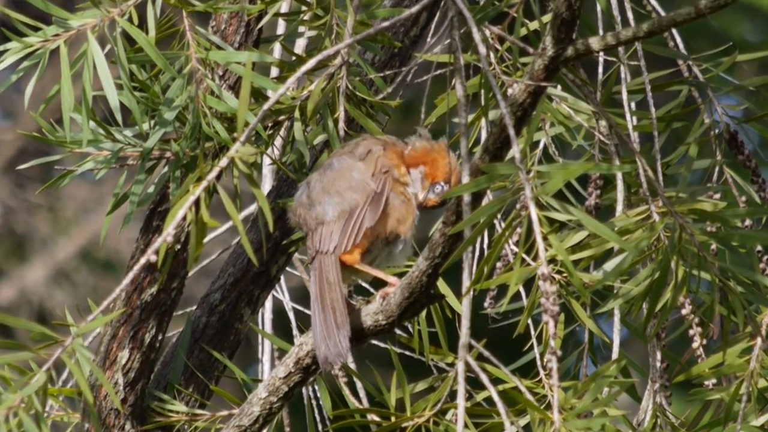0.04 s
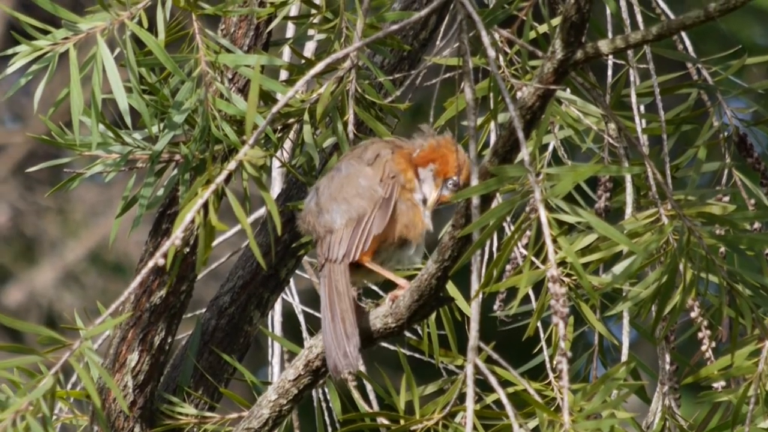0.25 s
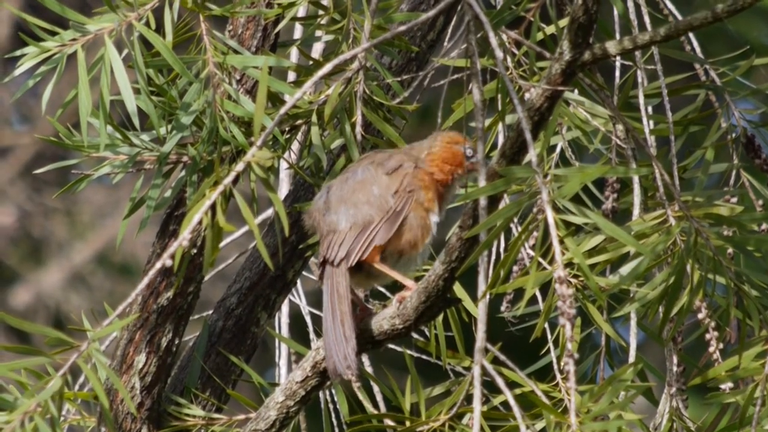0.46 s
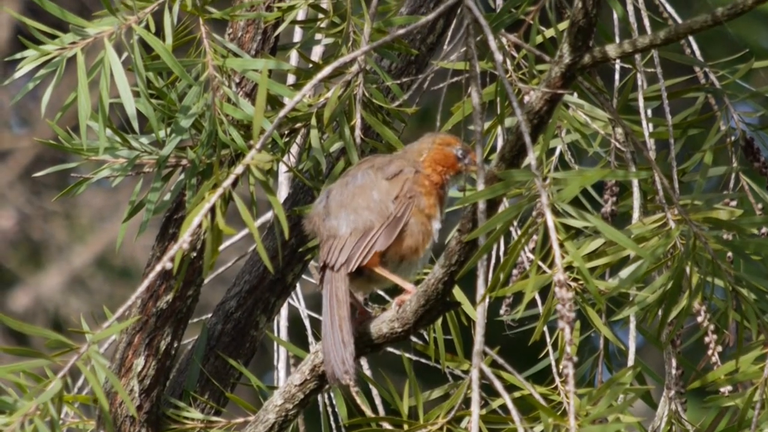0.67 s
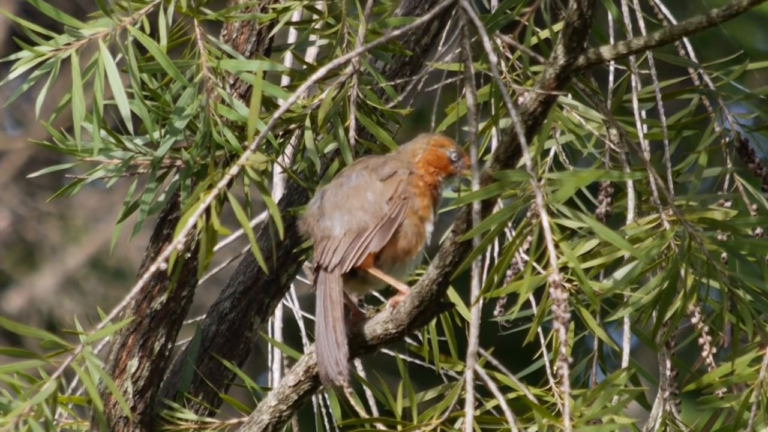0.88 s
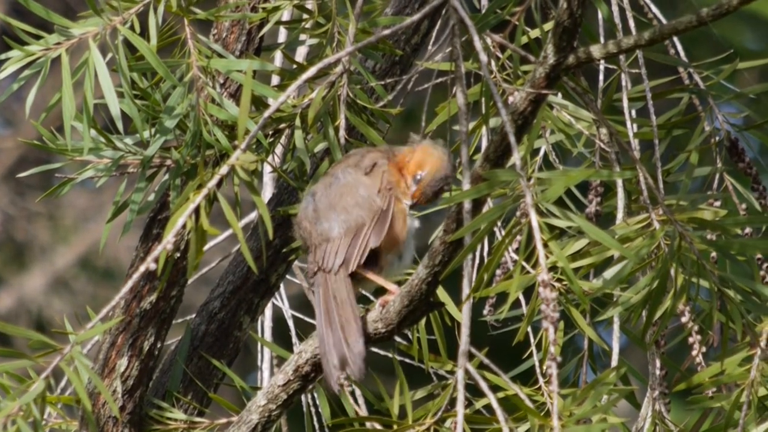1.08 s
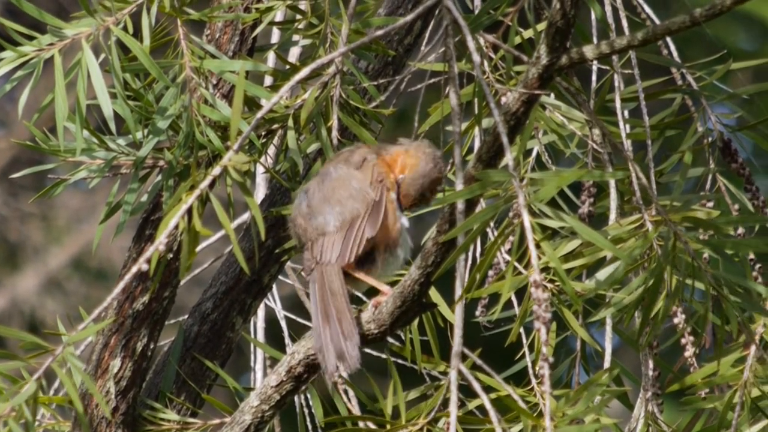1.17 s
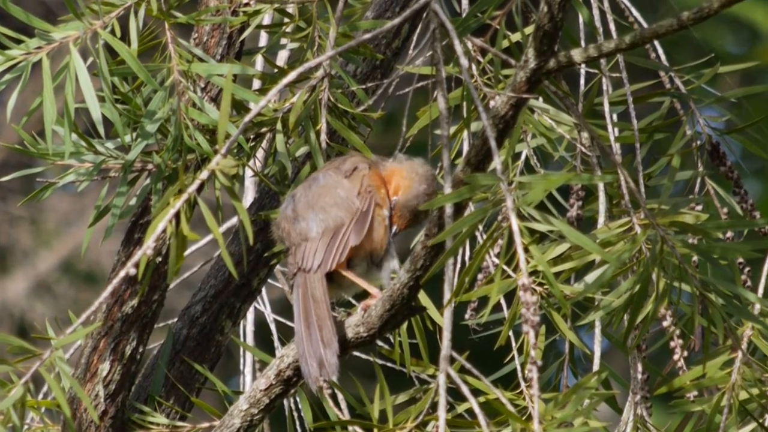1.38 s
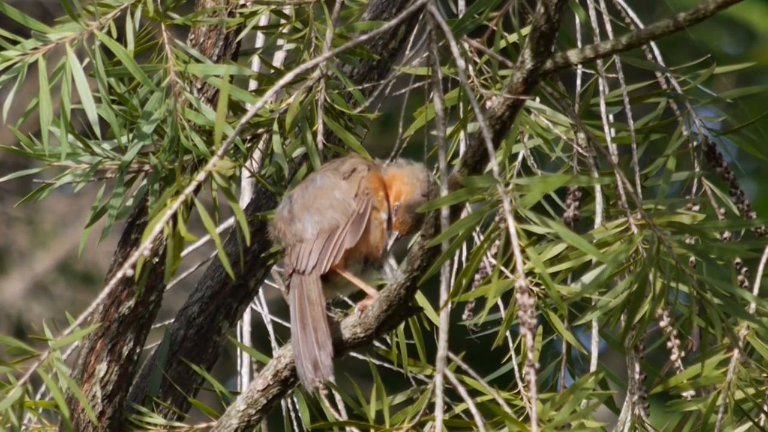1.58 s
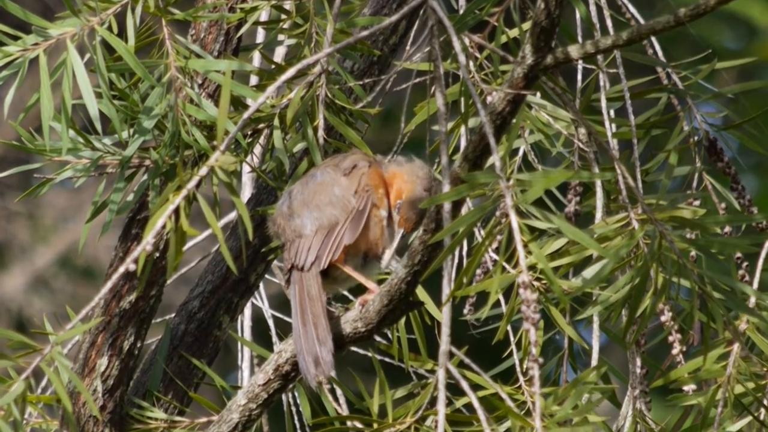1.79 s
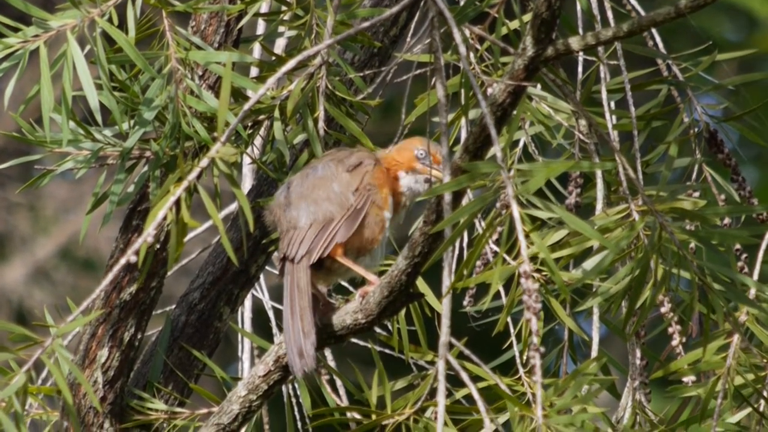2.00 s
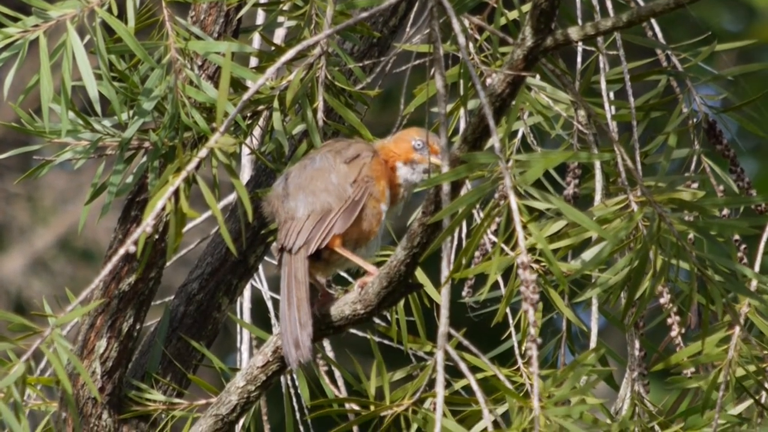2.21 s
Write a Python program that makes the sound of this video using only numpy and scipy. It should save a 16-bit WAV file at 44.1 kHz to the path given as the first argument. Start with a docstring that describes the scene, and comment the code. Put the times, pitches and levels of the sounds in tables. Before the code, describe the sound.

A babbler chatters a few short sharp notes, then a fast sinking trill, among leafy branches

```python
"""Soft outdoor hiss, a low hum and a distant rasp come first, then thin whistles and buzzy slurs of small birds.
A near babbler in leafy branches gives short notes, then swoops up into a fast trill that sinks away; a churr falls.
Calls are harmonics on gliding pitches, coloured by throat or distance; the hiss is shaped noise, the hum two partials.
Branch echoes and a diffuse tail of foliage scatter every call between the left and right channels."""
import sys
import numpy as np
from scipy import signal
from scipy.fft import rfft, irfft
from scipy.io import wavfile
from scipy.ndimage import uniform_filter1d

SR = 44100
rng = np.random.default_rng(int(sys.argv[2]) if len(sys.argv) > 2 else 0)


def master(y):
    """Save y as 16-bit WAV."""
    cut = np.clip(np.atleast_2d(y).T, -1, 1)
    pcm = np.round(cut * 32767)  # scale
    wavfile.write(sys.argv[1], SR, pcm.astype(np.int16))


N = 99225
T = np.arange(N) / SR  # s

# harmonics of the distant rasps and churr before distance dulls them: level_db
RASP_HARMONICS_DB = [-4, -18.5, -24]
# dulling of the rasps and churr by distance: frequency_hz, gain_db
DISTANCE_LOSS = [(6000, -0.5), (9500, -2), (11500, -21), (15000, -20)]
# harmonics of the small birds' whistles and slurs: level_db
WHISTLE_HARMONICS_DB = [0, -38.5]
RASP_EDGE_S, RASP_JITTER = 0.0071, .024  # fade length; rms pitch jitter as a share of the pitch


def amp(db):
    """Decibels to gain."""
    return 10 ** (np.asarray(db) / 20)


def unit(x):
    """Scales to rms 1."""
    return x / np.sqrt(np.mean(x ** 2) + 1e-20)


def read(points, hz):
    """Reads a spectrum on a log-frequency axis."""
    f, value = np.transpose(points)
    return np.interp(np.log(hz + 1), np.log(f), value)


def drift(hz):
    """Smooth random wander of rms 1, up to about this rate."""
    lowpass = 1 + (np.fft.rfftfreq(N, 1 / SR) / hz) ** 4
    return unit(irfft(rfft(rng.standard_normal(N)) / lowpass, N))


def gate(start, end, edge):
    """Opens and closes smoothly, half open at the two times."""
    openness = np.minimum(T - start, end - T) / edge + .5
    return np.sin(np.pi / 2 * np.clip(openness, 0, 1)) ** 2


def contour(points, edge_s=.005):
    """Pitch and gain of one note from its curve, with the pitch corners rounded."""
    s, hz, db = np.transpose(points)
    pitch = uniform_filter1d(np.interp(T, s, hz), size=180)
    return pitch, amp(np.interp(T, s, db)) * gate(s[0], s[-1], edge_s)


def voice(hz, gain, harmonics_db, throat=None):
    """Harmonics on one pitch, each weighted by the throat or distance response as it glides."""
    out, on = np.zeros(N), gain > 0
    turn = 2 * np.pi * np.cumsum(hz[on]) / SR
    for k, db in enumerate(harmonics_db, 1):
        colour = read(throat, k * abs(hz[on])) if throat else 0
        audible = k * hz[on] < SR / 2  # no harmonic folds over
        out[on] += amp(db + colour) * audible * np.sin(k * turn)
    return np.sqrt(2) * gain * out


def air():
    """Outdoor hiss: shaped noise with drifting patches, a varying treble and partly alike channels."""
    # colour of the hiss before patches and treble changes: frequency_hz, relative_density_db
    hiss_colour = [(25, -8), (80, -1), (170, -4), (310, 0), (480, -3.5), (1000, -5.5), (1600, -4),
                   (2500, -6), (3300, 0), (4100, -2), (5100, -1), (6600, -6), (8000, -15), (10000, -24),
                   (15500, -27)]
    # left-right likeness of the hiss: frequency_hz, likeness_0_to_1
    hiss_same = [(30, 0.1), (110, 0.76), (300, 0.13), (700, 0.21), (3000, 0.64), (12000, 0.49)]
    # treble change, in full above 2 kHz: time_s, gain_db
    treble_level = [(0, -0.5), (1.25, 3.5), (1.41, -4.5), (1.6, 0.5), (2.02, 0), (2.25, -0.5)]
    level_db, patch_db = -57.5, 2  # overall rms; rms depth of the patches
    hz = np.fft.rfftfreq(1024, 1 / SR)
    a, b, c, d, patches = rng.standard_normal((N // 256 + 5, len(hz), 5)).T
    patches = uniform_filter1d(patches, size=10, axis=0)  # blur over frequency
    patches = unit(uniform_filter1d(patches, size=12, axis=1))  # blur over time
    same = np.clip(read(hiss_same, hz), -1, 1)[:, None]
    left = a + 1j * b
    right = same * left + np.sqrt(1 - same ** 2) * (c + 1j * d)
    z = np.array([left, right]) * amp(read(hiss_colour, hz)[:, None] + patch_db * patches)
    frame_s = np.arange(a.shape[1]) * 256 / SR
    treble_db = np.interp(frame_s, *np.transpose(treble_level))
    z *= amp(treble_db * np.clip(hz / 1000 - 1, 0, 1)[:, None])  # eases in from 1 to 2 kHz
    hiss = signal.istft(z, nperseg=1024, noverlap=768)[1][:, :N]
    return amp(level_db) * unit(hiss)


def hum():
    """A low wavering hum of two harmonics that swells and fades."""
    # swelling of the hum before its harmonic weights: time_s, level_db
    hum_level = [(0, -59), (.14, -77), (.47, -84), (.55, -58), (.63, -74), (.8, -57.5), (.89, -70),
                 (1.09, -61), (1.18, -74.5), (1.55, -79), (1.64, -62.5), (1.73, -78), (1.89, -64),
                 (2.08, -64), (2.25, -69)]
    pitch_hz, waver = 117.6, 0.041  # waver: rms share of the pitch
    gain = amp(np.interp(T, *np.transpose(hum_level)))
    return voice(pitch_hz * (1 + waver * drift(20.7)), gain, [-1, -20])


def rasps():
    """Fast runs of rasping strokes, each flicking up in pitch and sliding down more slowly."""
    # rasping runs further off, before flutter, dulling and foliage: start_s, length_s, first_pitch_hz,
    # last_pitch_hz, first_swing_hz and last_swing_hz (either side of the pitch), strokes_per_s, level_db
    rasp_runs = [(-.02, 0.043, 2680, 2443, 257, 278, 68, -47),
                 (0.132, 0.11, 2335, 2245, 520, 483, 118, -54.5),
                 (0.234, 0.09, 3228, 2907, 740, 946, 97, -50),
                 (.395, .088, 3330, 2560, 480, 600, 70, -44.5),
                 (1.212, 0.09, 2900, 3616, 483, 584, 108, -53.5),
                 (1.447, .18, 3640, 3378, 418, 630, 123, -54),
                 (1.499, 0.078, 2530, 2150, 684, 626, 76, -54),
                 (1.986, 0.072, 3280, 3220, 323, 295, 102, -56)]
    fall_share, pulse_db = 0.657, 1.5  # share of a stroke spent falling; louder at the top of the stroke
    stumble_turns, flutter_db = .07, 1.8  # rms unevenness of the strokes; rms level flutter
    out, jitter, pace = np.zeros(N), drift(650), stumble_turns * drift(48.4)
    flutter = flutter_db * drift(123)
    for start, length, hz0, hz1, swing0, swing1, rate, db in rasp_runs:
        span = [start, start + length]
        turns = (T - start) * rate
        stroke = signal.sawtooth(2 * np.pi * (turns + pace), 1 - fall_share)
        hz = np.interp(T, span, [hz0, hz1]) + stroke * np.interp(T, span, [swing0, swing1])
        gain = amp(db + pulse_db * stroke + flutter) * gate(*span, RASP_EDGE_S)
        out += voice(hz * (1 + RASP_JITTER * jitter), gain, RASP_HARMONICS_DB, DISTANCE_LOSS)
    return out


def slurs():
    """Glides, mostly high, with a quick buzz and a rough jitter in their pitch."""
    # buzzy slurred whistles before the foliage, one curve each: time_s, pitch_hz, level_db
    slur_curves = [
        [(.11, 6950, -66), (.14, 8520, -65)],
        [(.146, 6130, -51), (.18, 5370, -56), (.21, 5194, -58.5), (.243, 5845, -50), (.27, 6160, -52.5)],
        [(.365, 6610, -58), (.40, 5850, -50.5), (.428, 5820, -58), (.445, 6820, -61), (.484, 6670, -50),
         (.52, 6930, -94)],
        [(.60, 8540, -65), (.655, 7950, -61.5), (.725, 7020, -53.5), (.76, 5670, -49.5), (.797, 5490, -62)],
        [(.845, 5700, -52.5), (.905, 5977, -50), (.97, 5970, -60), (1.015, 6520, -53), (1.04, 6830, -68)],
        [(1.155, 6380, -60.5), (1.18, 5920, -53), (1.212, 5850, -66)],
        [(1.213, 3810, -51), (1.25, 4780, -49.5), (1.29, 5440, -51.5), (1.325, 6000, -55), (1.37, 6150, -67)],
        [(2.07, 5380, -60), (2.11, 5190, -65), (2.14, 5040, -73)],
        [(2.19, 7300, -72.5), (2.25, 7050, -67)],
        [(1.088, 5310, -71), (1.10, 5050, -51), (1.115, 4800, -54)],
    ]
    buzz_hz, buzz_swing, jitter = 179.7, 0.0085, 0.0242  # swing (peak) and jitter (rms): shares of the pitch
    buzz_turns = np.cumsum(buzz_hz * (1 + 0.1594 * drift(50.0))) / SR
    buzz = 1 + buzz_swing * np.sin(2 * np.pi * buzz_turns) + jitter * drift(500)
    return sum(voice(hz * buzz, gain, WHISTLE_HARMONICS_DB) for hz, gain in map(contour, slur_curves))


def whistles():
    """Nearly pure gliding tones: a faint second harmonic and a slight pitch jitter."""
    # thin whistles of small birds before the foliage, one curve each: time_s, pitch_hz, level_db
    whistle_curves = [
        [(.18, 5220, -51), (.192, 5130, -42), (.225, 5400, -68), (.26, 6170, -55), (.30, 6300, -54),
         (.345, 6320, -55)],
        [(.314, 2590, -53), (.32, 1860, -60.5), (.329, 1150, -60)],
        [(1.45, 4860, -60), (1.458, 5180, -57.5), (1.467, 4900, -57)],
        [(1.487, 3970, -66), (1.503, 5470, -57), (1.53, 6220, -70)],
        [(1.525, 8600, -88), (1.58, 6700, -61.5), (1.598, 8300, -72)],
        [(1.594, 5000, -53), (1.605, 6080, -61.5), (1.622, 4700, -55), (1.637, 4450, -58.5), (1.665, 4850, -54),
         (1.704, 5040, -53), (1.716, 4570, -50), (1.735, 4480, -73)],
        [(1.715, 6530, -69), (1.745, 6600, -61), (1.768, 6680, -66)],
        [(1.788, 4880, -56), (1.813, 5210, -46), (1.836, 6180, -67), (1.851, 6960, -62), (1.868, 4750, -54.5),
         (1.886, 7120, -55)],
        [(2.15, 5110, -65), (2.18, 4500, -70), (2.215, 4580, -66)],
    ]
    jitter = 1 + 0.0048 * drift(250)
    return sum(voice(hz * jitter, gain, WHISTLE_HARMONICS_DB) for hz, gain in map(contour, whistle_curves))


def babbler():
    """The near bird: throat-coloured notes, then a slowing trill that sinks slowly and flicks up again."""
    # short notes before throat and foliage, one curve each: time_s, pitch_hz, level_db
    note_curves = [
        [(.556, 3510, -49), (.562, 3996, -38), (.571, 4136, -39.5), (.577, 3343, -36), (.585, 3827, -35),
         (.596, 3323, -27.5), (.608, 3273, -33.5), (.616, 2710, -47)],
        [(.650, 2040, -35), (.657, 2874, -44), (.662, 3318, -31.5), (.670, 3500, -31), (.686, 3497, -45.5),
         (.695, 3495, -28.5), (.702, 2820, -35), (.710, 3460, -32.5), (.723, 2590, -48)],
        [(.726, 3180, -57), (.736, 3580, -40.5), (.748, 3600, -49), (.758, 3640, -57)],
        [(.771, 1396, -45), (.783, 2140, -35), (.790, 2274, -39.5), (.798, 2150, -38)],
        [(2.067, 2200, -56), (2.071, 2880, -52.5), (2.075, 2640, -43), (2.079, 3346, -48), (2.089, 3315, -54.5),
         (2.097, 2987, -42), (2.109, 3030, -58), (2.116, 3090, -48), (2.121, 2850, -72)],
    ]
    # the trill: a swoop, then the base under the warble: time_s, pitch_hz, level_db
    trill_curve = [(.831, 1410, -50), (.837, 1970, -36.5), (.851, 2420, -34), (.867, 2880, -41),
                   (.883, 3250, -32.5), (.900, 3020, -38), (.909, 2520, -30), (.920, 1900, -33.5),
                   (.955, 1980, -33.5), (1.018, 1930, -35.5), (1.053, 1835, -34.5), (1.088, 1740, -38),
                   (1.124, 1590, -40.5), (1.162, 1436, -43.5), (1.2, 1419, -46), (1.215, 1210, -57),
                   (1.233, 1203, -66)]
    # height of the warble above the base pitch: time_s, height_hz
    warble_height = [(.918, 0.5), (.930, 1290), (.965, 1240), (1.03, 1150), (1.066, 770), (1.10, 560),
                     (1.14, 390), (1.2, 68)]
    # harmonics at the voice organ, before the throat: level_db
    organ_harmonics_db = [-1, -1.5, -9.5, -2, -16, -26]
    # response of throat and bill: frequency_hz, gain_db
    throat_response = [(1000, 2), (1600, -21.5), (2300, -16.5), (3100, -1.5), (3900, -1), (4500, -9),
                       (5400, -18.5), (6800, -31.5), (8800, -26.5), (12500, -30), (14500, -56),
                       (16000, -56)]
    jitter = 1 + .008 * drift(500)  # share of the pitch
    flutter = amp(.8 * drift(138))  # dB rms
    warble_hz, slowing_hz_per_s, crest_s = 32.3, 35, .932  # rate at the first crest; its slowing; crest time
    point, lag_turns = 1.15, .13  # sharpness of the crests; how late the trough comes
    crest_dip_db = -1  # level change at the top of the tallest warble
    rattle_hz, rattle_depth = 170, .25  # mean rate; gain swing where the warble is tallest

    base, gain = contour(trill_curve)
    t = T - crest_s
    turns = (warble_hz - slowing_hz_per_s * t / 2) * t
    lagged = turns - lag_turns * np.sin(np.pi * turns) ** 2
    # the sinking pitch dips the second harmonic into the throat resonance
    warble = abs(np.cos(np.pi * lagged)) ** (2 * point)
    swing = np.interp(T, *np.transpose(warble_height))
    depth = swing / swing.max()
    rattle_turns = np.cumsum(rattle_hz * (1 + 0.17 * drift(53.3))) / SR
    rattle = 1 + rattle_depth * depth * np.sin(2 * np.pi * rattle_turns)
    trill = base + warble * swing, gain * rattle * amp(crest_dip_db * warble * depth)
    calls = [*map(contour, note_curves), trill]
    return sum(voice(hz * jitter, g * flutter, organ_harmonics_db, throat_response) for hz, g in calls)


def churr():
    """One falling call whose pitch swings evenly up and down, loudest at the foot of each stroke."""
    # the churr before dulling and foliage: time_s, lowest_pitch_hz, sweep_above_hz, strokes_per_s, level_db
    churr_curve = [(1.666, 3570, 608, 130, -51), (1.715, 3307, 1106, 119, -49),
                   (1.752, 3030, 1602, 110, -48.5), (1.79, 2740, 1595, 95, -47.5),
                   (1.836, 2213, 1795, 85, -49), (1.879, 2257, 1470, 106, -51)]
    top_db = -4  # level at the top of a stroke against its foot
    s, low, sweep, rate, db = np.transpose(churr_curve)
    turns = np.cumsum(np.interp(T, s, rate) * (T > s[0])) / SR
    rise = np.sin(np.pi * turns) ** 2
    hz = np.interp(T, s, low) + rise * np.interp(T, s, sweep)
    hz = hz * (1 + RASP_JITTER * drift(700))
    gain = amp(np.interp(T, s, db) + top_db * rise) * gate(s[0], s[-1], RASP_EDGE_S)
    return voice(hz, gain, RASP_HARMONICS_DB, DISTANCE_LOSS)


def place(x, pan_db, wet_db, echo_db, likeness):
    """Direct sound, branch echoes and a diffuse tail from the leaves; positive pan leans left."""
    # echoes off near branches, gains before echo_db: delay_s, left_gain, right_gain
    branch_echoes = [(.0031, 0.17, -0.11), (.0071, -0.29, -0.1), (.0089, -0.13, -0.088),
                     (0.0138, 0.26, 0.17), (0.023, 0.16, 0.021), (0.027, 0.079, 0.065)]
    # decay of the foliage beneath the stronger early leaves: frequency_hz, t60_s
    foliage_decay = [(1500, 0.35), (3300, 0.41), (6000, 0.84), (13000, 0.14)]
    # small leaves scatter the treble most: frequency_hz, gain_db
    leaf_scatter = [(6000, 0), (9000, 6), (12000, 8)]
    near_db, near_s, onset_s = 6, 0.039, 0.0034  # near leaves over the late tail, their decay; tail's rise
    # sparse random reflections, half a second long
    a, b = rng.standard_normal((2, SR // 2)) * (rng.random((2, SR // 2)) < .1)
    same = np.clip(likeness, 0, 1)
    hz, t, z = signal.stft([a, same * a + np.sqrt(1 - same ** 2) * b], SR, nperseg=256)
    swell = np.minimum(t / onset_s, 1) * (1 + amp(near_db) * np.exp(-t / near_s))
    decay = np.exp(-np.log(1000) * t / read(foliage_decay, hz)[:, None])
    tail = signal.istft(z * swell * decay, SR, nperseg=256)[1]
    tail *= amp(wet_db) / np.linalg.norm(tail[0])  # wet level, before the treble scatter
    tail = irfft(rfft(tail) * amp(read(leaf_scatter, np.fft.rfftfreq(tail.shape[1], 1 / SR))))
    for delay, left, right in branch_echoes:
        tail[:, round(delay * SR)] += amp(echo_db) * np.array([left, right])
    direct = x * amp([[pan_db / 2], [-pan_db / 2]])
    return direct + signal.fftconvolve(x[None], tail, axes=1)[:, :N]


def scene():
    """Places each bird in the leaves over the hiss and hum, which reach the microphone directly."""
    return (place(babbler(), pan_db=2.5, wet_db=-4, echo_db=5, likeness=0.84)
            + place(rasps(), pan_db=4.5, wet_db=-2.5, echo_db=1, likeness=0.95)
            + place(churr(), pan_db=4.5, wet_db=-3.5, echo_db=1, likeness=1.0)
            + place(whistles(), pan_db=0.5, wet_db=-5.5, echo_db=-1, likeness=0.31)
            + place(slurs(), pan_db=-5, wet_db=-1.5, echo_db=4, likeness=0.16)
            + air() + hum())


def record(dry):
    """The recorder's band limit: a steep low-pass."""
    cut_hz = 15700
    lowpass = signal.firwin(511, cut_hz, window=("kaiser", 9), fs=SR)
    return signal.oaconvolve(dry, lowpass[None], "same")


dry = scene()
out = record(dry)
master(out)
```